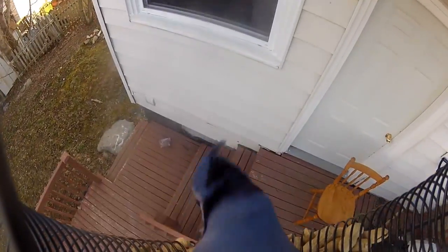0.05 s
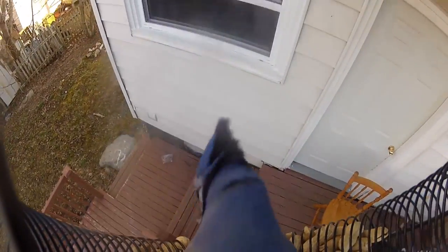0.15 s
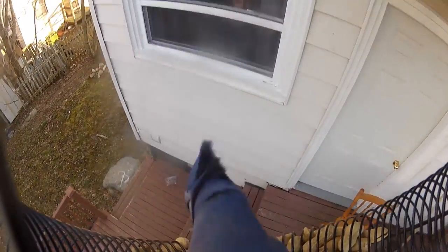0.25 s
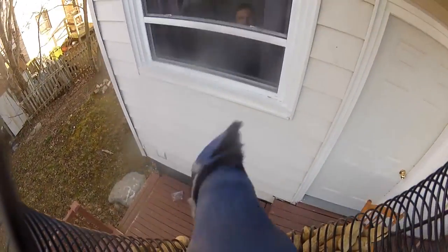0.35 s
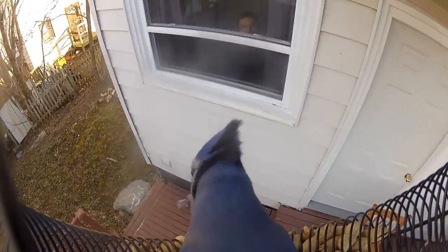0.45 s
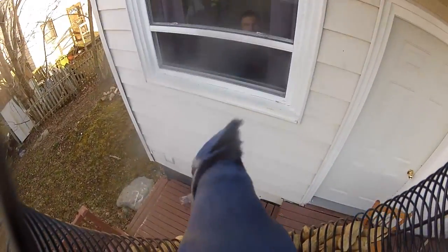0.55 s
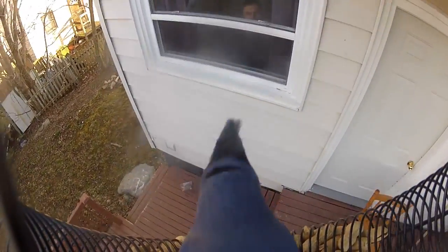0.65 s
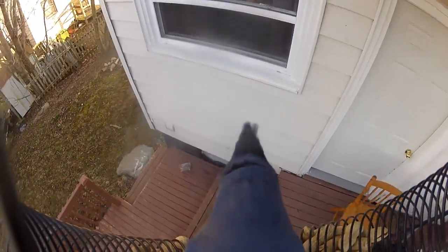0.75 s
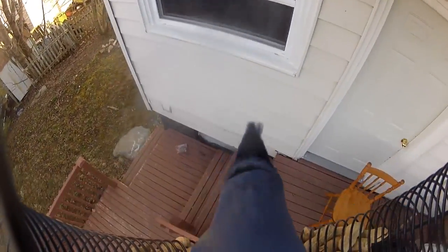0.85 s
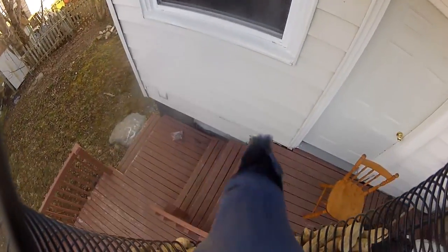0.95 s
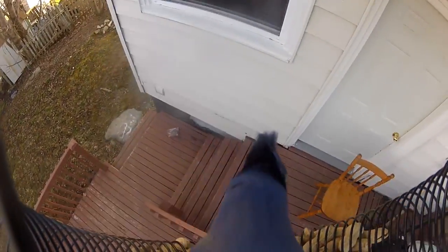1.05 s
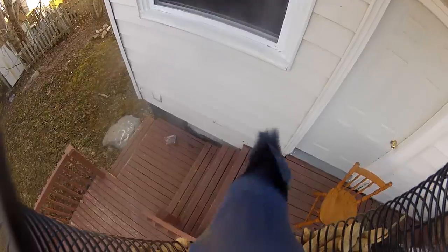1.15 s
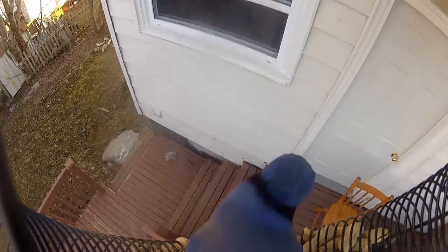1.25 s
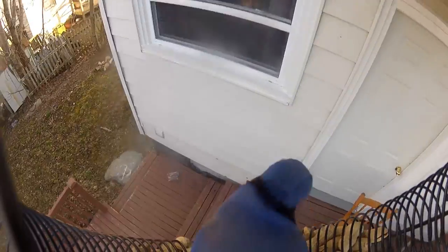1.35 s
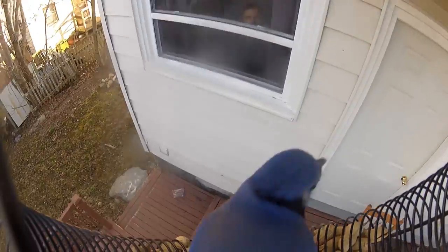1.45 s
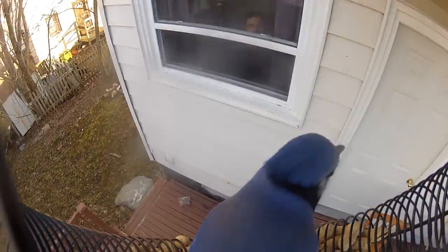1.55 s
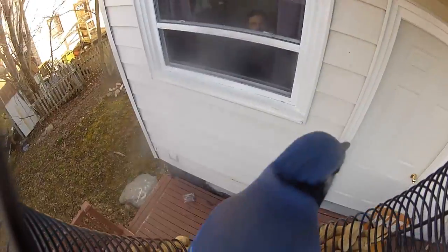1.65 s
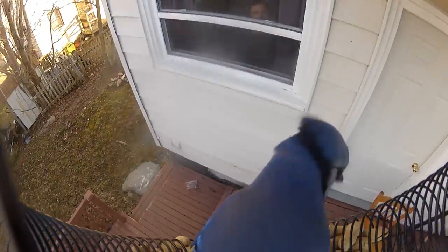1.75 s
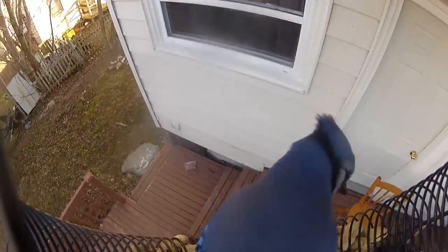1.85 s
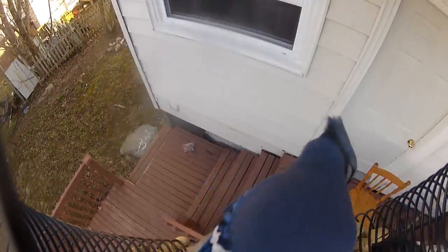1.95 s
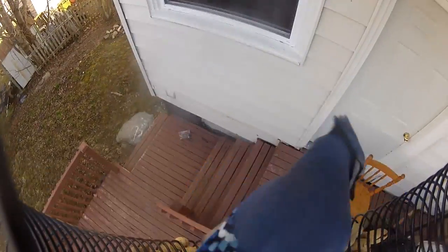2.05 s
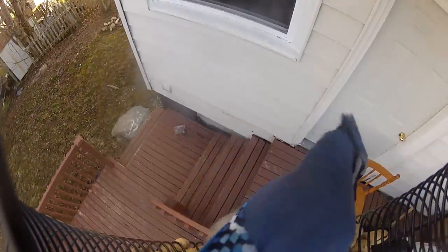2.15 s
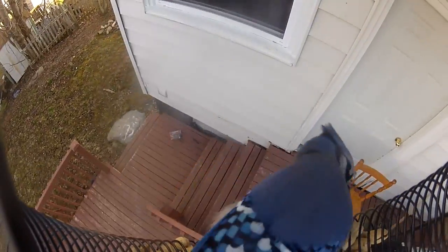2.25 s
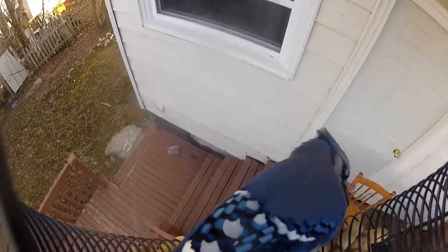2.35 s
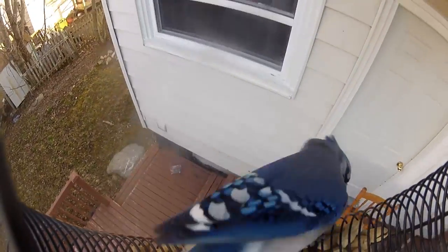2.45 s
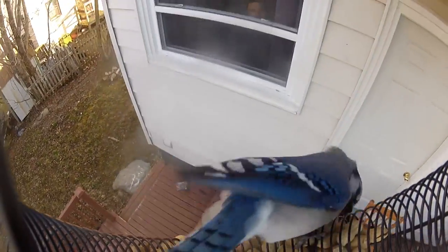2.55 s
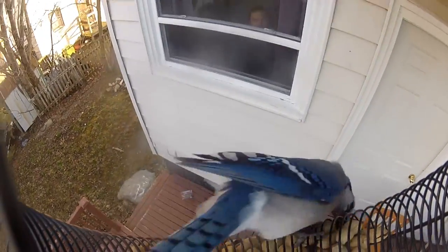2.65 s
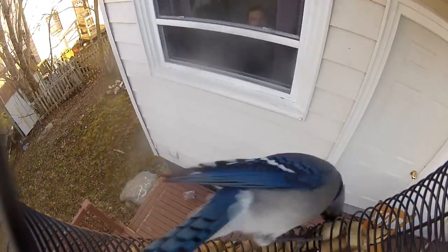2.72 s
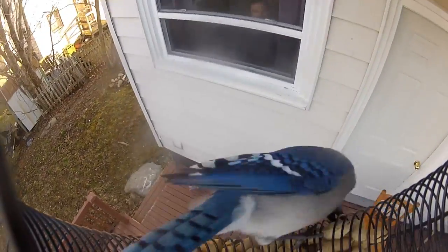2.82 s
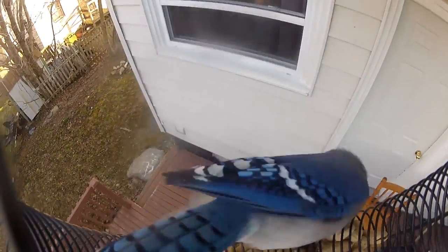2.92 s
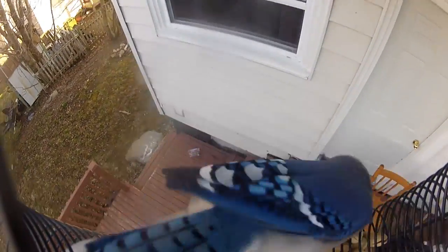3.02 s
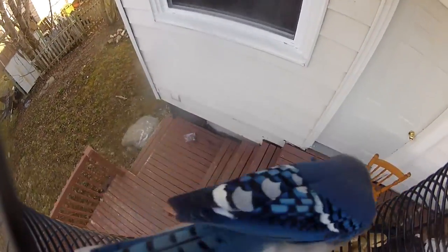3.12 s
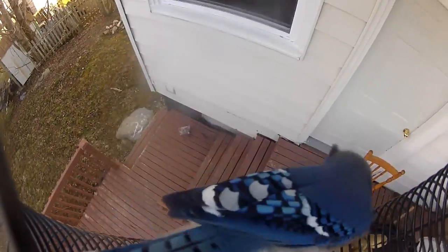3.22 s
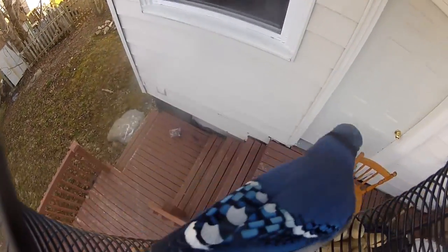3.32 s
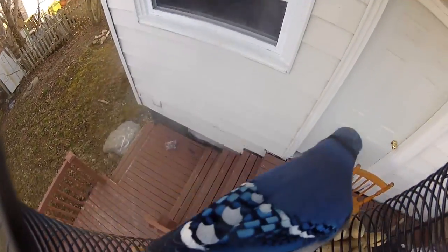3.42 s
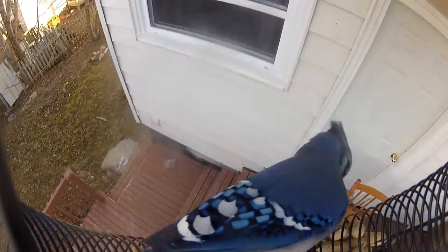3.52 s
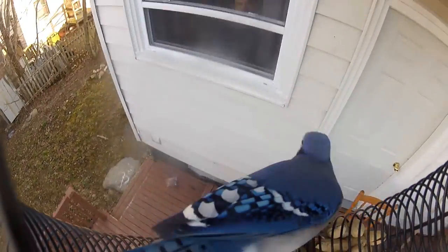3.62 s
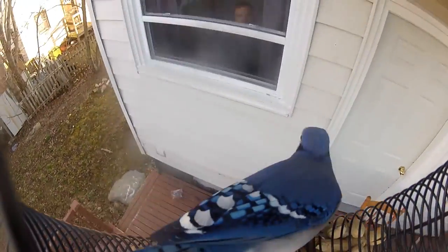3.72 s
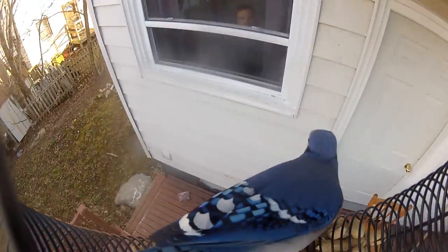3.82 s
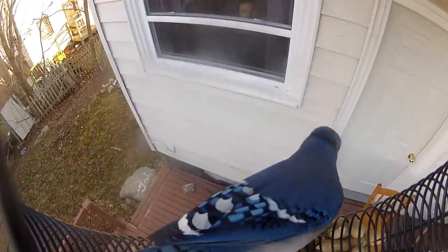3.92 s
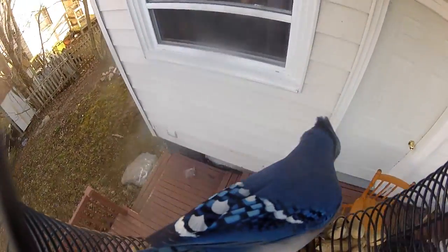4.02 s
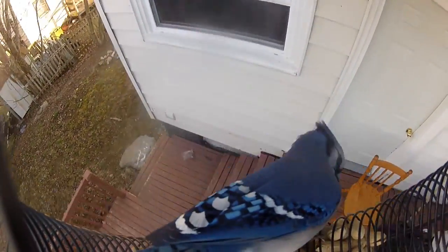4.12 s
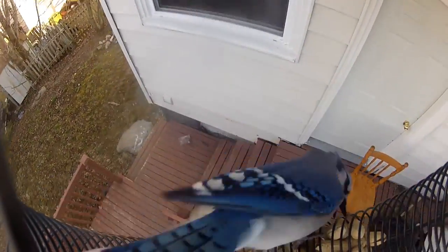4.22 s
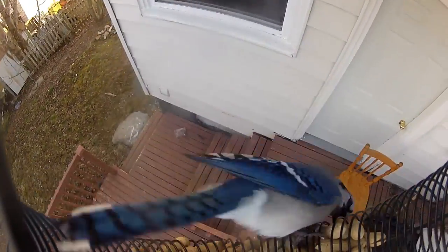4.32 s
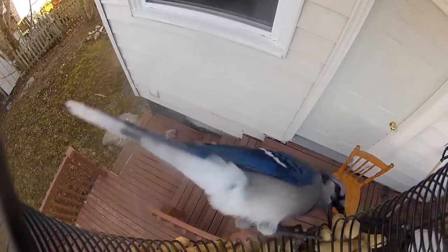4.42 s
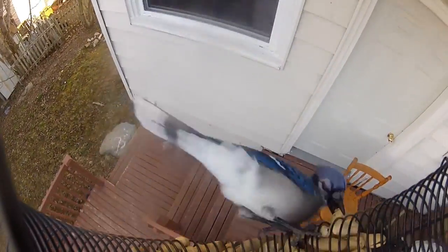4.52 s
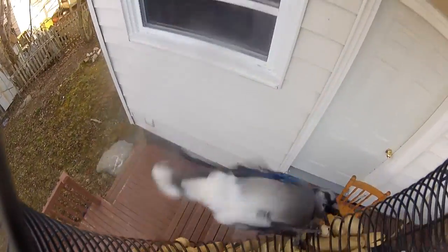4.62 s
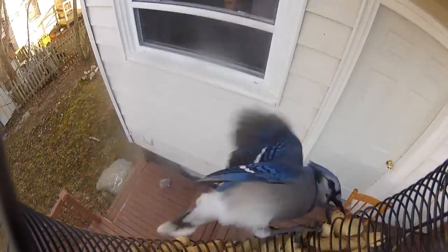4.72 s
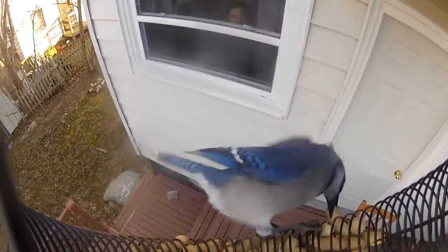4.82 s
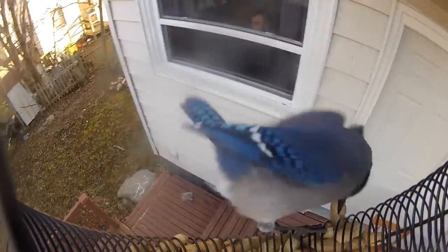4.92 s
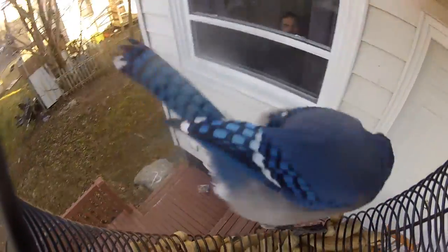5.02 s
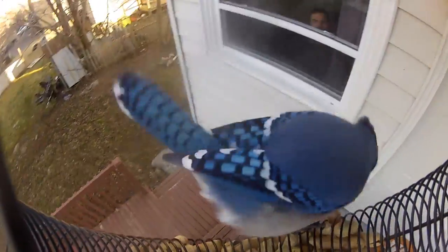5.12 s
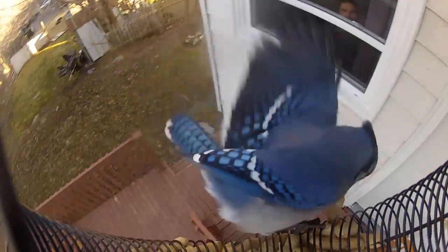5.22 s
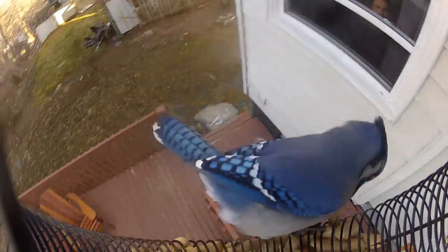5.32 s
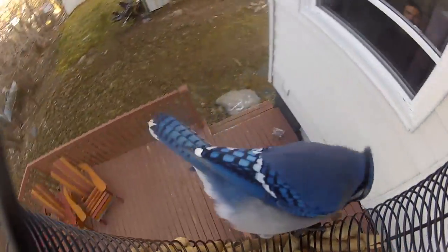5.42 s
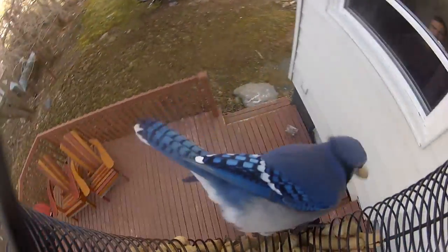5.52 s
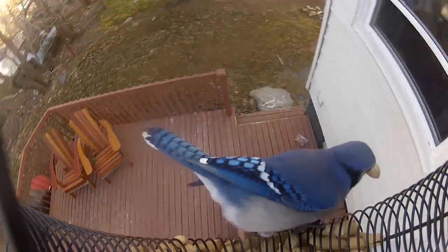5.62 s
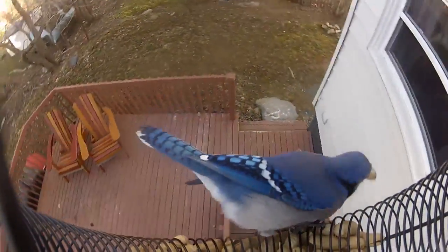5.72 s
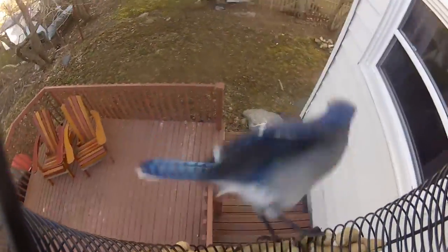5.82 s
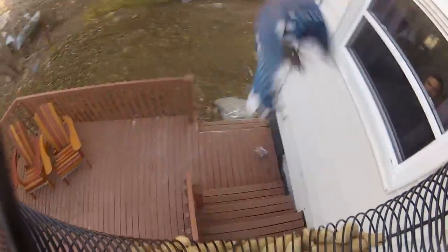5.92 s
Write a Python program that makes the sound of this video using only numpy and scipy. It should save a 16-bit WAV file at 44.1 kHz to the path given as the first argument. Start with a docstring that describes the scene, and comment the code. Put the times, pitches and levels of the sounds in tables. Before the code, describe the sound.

Heard from on the feeder itself, a jay's claws and beak clatter on springy wire, then pause with only faint ticks. From about 1.5 seconds tugs rattle the nuts, with wire pings and a falling zing. After a brief lull near four seconds, the hardest knocks crack on the housing in quick clusters, low rumbles following. It thins out and ends on one more sharp knock.

```python
"""A jay shifts about on a wire-coil peanut feeder, pecks, and tugs a nut loose; the microphone sits on the feeder.
First claws and beak chatter on the wires, as filtered noise decaying by band, then come sparse light touches.
From 1.5 s tugs set the nuts jostling (random clicks through resonances), with wire rings and falling zings.
After a lull near 4 s the hardest blows crack on the housing (decaying modes), and one more knock ends it.
Throughout, the swaying feeder rumbles after each tug and the yard behind is quiet, both as coloured noise."""
import sys
import numpy as np
from scipy import signal
from scipy.io import wavfile

SR = 44100
rng = np.random.default_rng(int(sys.argv[2]) if len(sys.argv) > 2 else 0)


def put_to_file(sound):
    """Save the sound as 16-bit audio at rate SR, in the file named by the first command-line argument."""
    columns = np.atleast_2d(sound).T  # one column per channel
    safe = np.clip(columns, -1, 1)
    whole_steps = np.round(safe * 32767)
    wavfile.write(sys.argv[1], SR, whole_steps.astype(np.int16))


N = 262836
TIME = np.arange(N) / SR
CUTOFF_HZ = 16000

# Beak and claws scuffing the coil: (time [s], level [dB], thud re level [dB],
# scratch re level [dB], pitch of the struck wire [Hz])
TOUCHES = [(0.046, -39.5, -26, -11.5, 890), (0.073, -27, -31, -39, 765), (0.153, -33, -26, -28, 610),
           (0.232, -24.5, -16, -22.5, 2960), (0.25, -19.5, -33, -26, 1363), (0.276, -11, -21.5, -31, 820),
           (0.307, -14, -20, -29.5, 916), (0.841, -37, -18, -30, 1023), (0.994, -48, -5.5, -30, 860),
           (1.275, -53, -7, -30, 845), (1.322, -42, -52, -24, 2690), (1.504, -15.5, -20, -21.5, 974),
           (1.551, -14, -14.5, -24.5, 2895), (1.618, -10.5, -28.5, -34, 1005),
           (1.874, -33.5, -42, -21, 900), (1.896, -9.5, -24.5, -35.5, 877), (1.951, -41, -18, -10, 900),
           (1.977, -18, -19, -35, 717), (2.002, -11, -22.5, -35, 2197), (2.105, -12.5, -23.5, -18.5, 890),
           (2.197, -20.5, -27, -27, 2346), (2.218, -20, -39, -49, 2450), (2.609, -15.5, -19.5, -22, 970),
           (2.719, -23.5, -9.5, -26, 690), (2.835, -15, -14, -32, 1630), (2.857, -18.5, -6, -31, 920),
           (2.992, -13.5, -17, -45, 660), (3.112, -9, -28, -30, 1593), (3.192, -13.5, -17, -49, 630),
           (3.351, -6.5, -17.5, -40, 1044), (3.372, -12.5, -24.5, -38, 648), (3.754, -37, -33, -35, 1750),
           (4.309, -38, -25, -19, 2345), (4.405, -29, -8.5, -29, 1060), (4.436, -23, -7.5, -36, 1630),
           (4.5, -15, -11.5, -38, 1650), (4.57, -16.5, -8.5, -40, 940), (4.704, -8, -44, -31.5, 2230),
           (5.5, -16.5, -16, -36, 985), (5.665, -32.5, -30, -40, 620), (5.747, -28.5, -5, -34, 590),
           (5.906, -28, -33, -27, 2210)]


def touches(responses, clang_db=-11.5, weight=0.078, grip_s=0.0036, chatter_s=0.0029,
            wire_db=-11, wire_t60=0.088, held_t60=1.3):
    """Impulse excitation with stick-slip: a push and a burst of tiny slips drive the coil and ring one wire."""
    forces, wires = np.zeros((len(responses), 3, N)), np.zeros(N)
    t = np.arange(-SR // 50, SR // 16) / SR
    # cubing the noise makes the slips spiky
    slips = rng.standard_normal((len(TOUCHES), len(t))) ** 3
    for k, (s, db, thud, scratch, hz) in enumerate(TOUCHES):
        push, shake, scrape = forces[k % len(responses)]
        burst = slips[k] * np.exp(-abs(t) / np.where(t < 0, grip_s, chatter_s))
        burst = burst / np.linalg.norm(burst)
        add(push, s, from_db([db + thud]))
        # the more weight behind a touch, the more the whole coil clangs
        add(shake, s + t[0], from_db(db + clang_db + weight * thud) * burst)
        add(scrape, s + t[0], from_db(db + scratch) * burst)
        add(wires, s, from_db(db + wire_db) * wire_tone(hz, wire_t60, rise_s=0.00018))
    # the foot that holds the wire damps it
    held = responses * dying(np.arange(SR) / SR, held_t60)
    return through_coil(forces, held) + wires


# Relative colour of the ringing coil: (frequency [Hz], level per hertz [dB])
COIL = [(140, -13), (240, -1), (320, -3), (680, -4.5), (800, -3.5), (1000, -4.5), (1600, -5.5), (2450, -2),
        (2800, -14), (3300, 4), (4300, -70.5), (7500, -41.5), (9800, -14), (12200, -27.5), (15000, -23.5)]
# First decay of the coil, before any damping by feet or nuts: (frequency [Hz], t60 [s])
COIL_T60 = [(150, 0.63), (400, 0.25), (900, 0.18), (2000, 0.11), (5500, 0.021), (10000, 0.13),
            (15000, 0.17)]
# Weaker after-ring of the spring, before the same damping: (frequency [Hz], t60 [s])
SPRING_T60 = [(150, 6.5), (400, 0.49), (900, 0.32), (2000, 0.26), (5500, 0.042), (10000, 0.62),
              (15000, 2.1)]
# Resonances of the frame that carries the coil: (frequency [Hz], width [Hz], added gain [dB])
FRAME = [(316.3, 3.6, 12), (525, 6.7, -4.5), (687.3, 36.4, 9), (974, 75, 11), (1287, 81, 0.5),
         (1630, 8.4, 9.5), (2358, 76, -1)]


def coil_responses(spring_db=-18, split_hz=580, spread_s=0.00045, scratch_t60=0.068, count=8):
    """Dispersion and two-stage decay: (thud, clang, scratch) at several places, rms 1 over the first 20 ms."""
    t, ring = np.arange(SR) / SR, 0
    for hz, band in noise_bands(118.5, (count, SR), count=36):
        # bending waves in wire are dispersive: the lows build up later than the highs
        arrival = 1 - np.exp(-t / (spread_s * np.sqrt(1000 / hz)))
        first_decay = dying(t, at_hz(COIL_T60, hz))
        after_ring = from_db(spring_db) * dying(t, at_hz(SPRING_T60, hz))
        ring = ring + band * (from_db(at_hz(COIL, hz)) * arrival * (first_decay + after_ring))
    ring = ring + sum(from_db(db) * resonance(ring, hz, width) for hz, width, db in FRAME)
    scratch_noise = butter(rng.standard_normal((count, SR)), [3000, 9500], "band")
    scratch = scratch_noise * dying(t, scratch_t60)
    thud = butter(ring, split_hz, "low", order=4)
    clang = butter(ring, split_hz, "high", order=4)
    parts = np.stack([thud, clang, scratch], axis=1)
    return parts / np.sqrt(np.mean(parts[..., :SR // 50] ** 2, axis=-1, keepdims=True))


def through_coil(forces, responses):
    """Linear superposition: each force is convolved with the response at its place, then all are summed."""
    return signal.fftconvolve(forces, responses, axes=-1)[..., :N].reshape(-1, N).sum(axis=0)


# Sharp pecks and knocks: (time [s], strength [dB], strongest pitch [Hz])
CRACKS = [(0.409, -21, 1190), (1.079, -52.5, 2430), (1.898, -13, 1350), (2.173, -22, 1330),
          (2.288, -21, 2100), (2.309, -30, 2080), (2.389, -27.5, 2020), (2.898, -13, 2300),
          (2.926, -13, 1000), (2.997, -22, 1960), (3.076, -14.5, 2160), (3.227, 0.5, 1470),
          (3.397, -8.5, 2030), (3.506, -13, 2170), (3.626, -40.5, 2215), (4.608, -9, 2200),
          (4.6405, -3.5, 1600), (4.672, -13.5, 1900), (4.89, -11.5, 1350), (4.911, 6, 1360),
          (5.021, -2.5, 930), (5.083, -14.5, 1240), (5.163, -8.5, 980), (5.178, 1, 2290), (5.185, 2, 2600),
          (5.216, -10, 1340), (5.235, -0.5, 2630), (5.33, -24, 2100), (5.352, -15, 1280), (5.378, -32, 947),
          (5.443, -26.5, 2040), (5.717, -33.5, 1930), (5.942, 3.5, 2500)]
# Relative modes of the housing: (frequency [Hz], level [dB])
HOUSING = [(680, -6), (950, -12.5), (1180, -4.5), (1350, 0), (1650, -3), (2035, -3), (2250, 0), (2390, 0),
           (2890, -9.5), (3730, -16), (8260, -22), (9100, -11.5), (9960, -9.5), (10700, -17.5),
           (13600, -12), (14900, -10.5)]
# a harder knock chokes the ring: its t60 is half of this limit at CHOKE_DB
KNOCK_T60_S, CHOKE_DB = 0.068, -8.5


def cracks(responses, level_db=-7, focus_db=6, scatter_db=2, rise_s=0.0004,
           snap_db=-14, snap_t60=0.019, thud_db=-29, clang_db=-25, stir_s=0.033,
           dull_hz=1300, dull_db_per_octave=25, hard_db=-14, snap_growth=0.33):
    """Modal excitation: a knock snaps, rings housing modes most near its own pitch, and stirs the coil."""
    out, t = np.zeros(N), np.arange(SR // 10) / SR
    chance = rng.standard_normal((len(CRACKS), len(HOUSING), 2))
    snap_noise = butter(rng.standard_normal((len(CRACKS), len(t))), 1600, "low", order=1)
    snaps = snap_noise * dying(t, snap_t60)
    for i, (s, db, pitch) in enumerate(CRACKS):
        thud, clang, _ = responses[i % len(responses)]
        t60 = KNOCK_T60_S / (1 + from_db(db - CHOKE_DB))
        # hard knocks snap most; low ones are soft contacts with little snap
        hardness_db = snap_growth * max(db - hard_db, 0)
        softness_db = dull_db_per_octave * min(np.log2(pitch / dull_hz), 0)
        add(out, s, from_db(db + snap_db + hardness_db + softness_db) * snaps[i])
        # the shorter the ring, the less the knock stirs the coil
        stirred = from_db(thud_db) * thud + from_db(clang_db) * clang
        add(out, s, from_db(db) * t60 / stir_s * stirred)
        for k, ((hz, mode_db), (strength, detune)) in enumerate(zip(HOUSING, chance[i])):
            octaves_away = min(abs(np.log2(hz / pitch)), 1)
            gain = from_db(db + level_db + mode_db - focus_db * octaves_away + scatter_db * strength)
            # successive modes alternate in polarity
            add(out, s, (-1) ** k * gain * wire_tone(hz * (1 + 0.016 * detune), t60, rise_s))
    return out


# Single wires slipping off a claw: (time [s], frequency [Hz], level [dB], t60 [s])
TWANGS = [(1.506, 2860, -23.5, 0.034), (1.553, 2950, -22, 0.035), (1.896, 2900, -13.5, 0.016),
          (2.201, 2380, -15.5, 0.066), (3.506, 2320, -30, 0.12)]
SQUEAK_S, SQUEAK_HZ = 2.19, 14300


def twangs(overtone_hz=9100, overtone_db=-17, overtone_t60=0.056,
           squeak_db=-30, squeak_t60=0.1, after_db=-48, after_t60=0.64):
    """Free vibration: released wires ring with a high overtone; one squeaks under a dragged claw and sings on."""
    out = np.zeros(N)
    for s, hz, db, t60 in TWANGS:
        add(out, s, from_db(db) * wire_tone(hz, t60, rise_s=0.00022))
        add(out, s, from_db(db + overtone_db) * wire_tone(overtone_hz, overtone_t60, rise_s=0.00027))
    add(out, SQUEAK_S, from_db(squeak_db) * wire_tone(SQUEAK_HZ, squeak_t60, rise_s=0.0053))
    add(out, SQUEAK_S, from_db(after_db) * wire_tone(SQUEAK_HZ, after_t60, rise_s=0.008))
    return out


def wire_tone(hz, t60, rise_s):
    """Damped oscillation: one mode swells briefly and rings out exponentially."""
    t = np.arange(int(t60 * SR) + 1) / SR
    return np.sin(2 * np.pi * hz * t) * (1 - np.exp(-t / rise_s)) * dying(t, t60)


# Kicks that run along the coil and come back: (time [s], level [dB])
ZINGS = [(0.285, -27), (1.555, -34), (2.858, -26), (3.358, -12.5)]
ZING_FROM_HZ, ZING_TO_HZ, ZING_FALL_S = 1150, 52.4, 0.021


def zings(rise_s=0.0088, t60=0.18):
    """Dispersion: bending waves reach the coil's end treble first, so a kick sweeps down into a low bump."""
    out, t = np.zeros(N), np.arange(SR // 4) / SR
    hz = ZING_TO_HZ + (ZING_FROM_HZ - ZING_TO_HZ) * np.exp(-(t / ZING_FALL_S) ** 2)
    tone = np.sin(2 * np.pi * np.cumsum(hz) / SR)
    sweep = tone * (1 - np.exp(-t / rise_s)) * dying(t, t60)
    for s, db in ZINGS:
        add(out, s, from_db(db) * sweep)
    return out


# The bird shifts its weight or tugs at a nut:
# (time [s], hold [s], relative effort [dB], relative swing of the feeder [dB])
TUGS = [(0.0, 0.044, -42.5, -37.5), (0.259, 0.051, -33, -44), (0.42, 0.023, -44.5, -36.5),
        (1.56, 0.067, -44, -42.5), (1.758, 0.089, -52.5, -44), (2.02, 0.25, -38.5, -34),
        (2.48, 0.072, -55.5, -45), (2.738, 0.17, -35.5, -34.5), (2.861, 0.2, -22, -31),
        (3.06, 0.13, -34.5, -32.5), (3.362, 0.018, -24, -29), (3.56, 0.25, -57, -42.5),
        (4.23, 0.18, -57.5, -49), (4.498, 0.077, -27, -29.5), (4.608, 0.029, -18, -28.5),
        (4.741, 0.058, -23, -25.5), (4.95, 0.24, -26.5, -31), (5.163, 0.039, -20, -28),
        (5.34, 0.031, -30.5, -37), (5.51, 0.059, -38, -44), (5.76, 0.075, -50.5, -41.5),
        (5.91, 0.052, -41.5, -42)]
# every tug builds up at one rate; afterwards each part of the feeder calms at its own
TUG_RISE_DB_PER_S = 315
RATTLE_FALL_DB_PER_S, JOSTLE_FALL_DB_PER_S, SWAY_FALL_DB_PER_S = 179, 85.5, 70


def shaking(levels_db, fall_db_per_s, settle_db, settle_db_per_s, rest_db):
    """Two-stage decay in dB: each tug rises, holds, falls by about settle_db, then settles towards rest."""
    out = np.full(N, float(rest_db))
    for (s, held_s, _, _), db in zip(TUGS, levels_db):
        before, after = np.maximum(s - TIME, 0), np.maximum(TIME - s - held_s, 0)
        release = np.maximum(-fall_db_per_s * after, settle_db - settle_db_per_s * after)
        out = np.maximum(out, db - TUG_RISE_DB_PER_S * before + release)
    return out


def nuts(responses, rattle_db=-7, clack_db=-8, tick_db=-9, wedged_db=-40, wedging=0.29,
         soft_hz=3300, soft_width_hz=1100, softness=0.56):
    """Random impacts: tugged nuts rattle on the wires, clack together and tap the housing."""
    effort_db = shaking(np.array(TUGS)[:, 2], RATTLE_FALL_DB_PER_S,
                        settle_db=-28.5, settle_db_per_s=61, rest_db=-66)
    # the nuts stick and then give way in little slides
    sliding_db = effort_db + slides(per_s=28, surge_db=8, slide_s=0.014)
    rattle = jostle(responses[:, 1], sliding_db, per_s=170, spread_db=1.0, damped_t60=0.24)
    rattle = rattle * from_db(rattle_db)
    # a nut is softer than a claw and misses the bright edge of the wire
    rattle = rattle - softness * resonance(rattle, soft_hz, soft_width_hz)
    # under gentle shaking the nuts stay wedged and knock together less
    loose_db = sliding_db + wedging * np.minimum(effort_db - wedged_db, 0)
    return rattle + nut_clacks(loose_db + clack_db) + housing_ticks(loose_db + tick_db)


def slides(per_s, surge_db, slide_s):
    """Stick-slip: the level in dB jumps as a nut gives way at a random moment, then relaxes."""
    gave_way = np.maximum.accumulate(np.where(rng.random(N) < per_s / SR, TIME, -np.inf))
    surge = np.exp(-(TIME - gave_way) / slide_s)
    return surge_db * (surge - surge.mean())


def jostle(responses, level_db, per_s, spread_db, damped_t60):
    """Damped impulse response: bumps at random places ring the wires, damped by what leans on them."""
    damped = responses * dying(np.arange(SR) / SR, damped_t60)
    damped = damped / np.linalg.norm(damped, axis=1, keepdims=True)
    return through_coil(bumps(level_db, per_s, spread_db, count=len(damped)), damped)


def nut_clacks(level_db, per_s=320, spread_db=6, lowest_hz=600, highest_hz=2500, width_hz=170,
               husk_hz=2700, count=14):
    """Cavity-like resonance: nuts knock and ring at hollow pitches, and soft husks take the edge off."""
    # the factor offsets the narrow resonances' loss of energy
    clicks = bumps(level_db, per_s, spread_db, count=count) * np.sqrt(SR / (np.pi * width_hz))
    pitches = np.geomspace(lowest_hz, highest_hz, count)
    rings = sum(resonance(row + 1e-18, hz, width_hz) for row, hz in zip(clicks, pitches))
    return butter(rings, husk_hz, "low", order=4)


def housing_ticks(level_db, per_s=55, spread_db=4, width_hz=50, scatter_db=4):
    """Modal excitation: nuts tap the housing at random, each tap with its own mix of modes."""
    taps, out = bumps(level_db, per_s, spread_db, count=1)[0], 0
    for k, (hz, db) in enumerate(HOUSING):
        strikes = taps * from_db(db + scatter_db * rng.standard_normal(N))
        out = out + (-1) ** k * resonance(strikes + 1e-18, hz, width_hz)
    return out * np.sqrt(SR / (np.pi * width_hz * len(HOUSING)))


def bumps(level_db, per_s, spread_db, count, busy_db=-30, crowding=0.35):
    """Random impulse process: uneven clicks with summed rms near level_db, denser under harder shaking."""
    rate = per_s * from_db(crowding * (level_db - busy_db)) / SR
    sizes = rms_one(from_db(spread_db * np.clip(rng.standard_normal((count, N)), -2, 1.5)))
    sizes = sizes * rng.choice([-1, 1], (count, N))
    happens = rng.random((count, N)) < rate / count
    return sizes * happens * from_db(level_db) / np.sqrt(rate)


def bumping(responses, bump_db=-8, follows=0.75):
    """Compressed response to effort: the load of nuts bumps dully in the coil even at a gentle tug."""
    load_db = shaking(follows * np.array(TUGS)[:, 2], JOSTLE_FALL_DB_PER_S,
                      settle_db=-24, settle_db_per_s=26.5, rest_db=-80.5)
    return from_db(bump_db) * jostle(responses[:, 0], load_db, per_s=95, spread_db=1.5, damped_t60=1.0)


# Relative colour of the hanging feeder's low swing: (frequency [Hz], level per hertz [dB])
SWAY = [(15, -39), (28, 12), (55, 6.5), (75, 9.5), (105, 7), (160, -13.5), (260, -42)]


def sway():
    """Slow damping: low noise swells with each tug as the hanging feeder rumbles and comes to rest."""
    swing_db = shaking(np.array(TUGS)[:, 3], SWAY_FALL_DB_PER_S,
                       settle_db=-7, settle_db_per_s=23.5, rest_db=-53.5)
    return from_db(swing_db) * coloured_noise(SWAY)


def fidgets(responses, damped_t60=0.28):
    """Stationary random impacts: toes shift on the wires in faint, scattered ticks."""
    return jostle(responses[:, 1], np.full(N, -67.0), per_s=80, spread_db=3, damped_t60=damped_t60)


# Relative colour of the still air of the yard: (frequency [Hz], level per hertz [dB])
AIR = [(15, -10.5), (25, 0), (92, -51), (170, -1), (301, 2), (560, -14), (2350, -23), (6050, -34.5),
       (6920, -39), (14400, -36.5), (16000, -52)]
AIR_DB = -57


def yard_air():
    """Stationary broadband noise: the quiet yard keeps one level and colour."""
    return from_db(AIR_DB) * coloured_noise(AIR)


def coloured_noise(spectrum):
    """Spectral shaping: weighted noise bands add up to steady noise of rms 1."""
    bands = noise_bands(14.63, (N,), count=20)
    return rms_one(sum(from_db(at_hz(spectrum, hz)) * band for hz, band in bands))


def noise_bands(lowest_hz, shape, count):
    """Band decomposition: yield (centre Hz, noise), neighbouring bands drawn from independent noises."""
    white = rng.standard_normal((2, *shape))
    edges = np.geomspace(lowest_hz, CUTOFF_HZ + 1000, count + 1)
    for k in range(count):
        yield np.sqrt(edges[k] * edges[k + 1]), butter(white[k % 2], edges[k:k + 2], "band")


def from_db(db):
    """Logarithmic level: decibels to amplitude gain."""
    return 10 ** (np.asarray(db) / 20)


def rms_one(x):
    """Normalisation: scale to rms 1."""
    return x / np.sqrt(np.mean(x ** 2) + 1e-20)


def at_hz(points, hz):
    """Interpolation: read a table on a log-frequency axis."""
    return np.interp(np.log(hz), np.log(np.array(points)[:, 0]), np.array(points)[:, 1])


def dying(t, t60):
    """Exponential decay: 60 dB down at t60."""
    return np.exp(-np.log(1000) * t / t60)


def butter(x, hz, kind, order=2):
    """Maximally flat filtering: a causal Butterworth filter."""
    return signal.sosfilt(signal.butter(order, hz, kind, fs=SR, output="sos"), x)


def resonance(x, hz, width):
    """Simple resonator: two poles with gain close to 1 at the peak."""
    r = np.exp(-np.pi * width / SR)
    poles = [1, -2 * r * np.cos(2 * np.pi * hz / SR), r * r]
    return signal.lfilter(np.array([1, 0, -1]) * (1 - r * r) / 2, poles, x)


def add(track, s, sound):
    """Superposition: mix a sound into a track at time s."""
    start = round(s * SR)
    track[start:start + len(sound)] += sound[:N - start]


def scene():
    """Structure-borne sound: everything reaches the microphone through the feeder, so there is no room."""
    responses = coil_responses()
    bird = touches(responses) + cracks(responses) + twangs() + zings()
    load = nuts(responses) + bumping(responses) + sway()
    return (bird + load + fidgets(responses) + yard_air())[None]


# The microphone port swallows one band: (frequency [Hz], width [Hz], share taken away [fraction])
PORT = (6030, 890, 0.74)


def record(dry):
    """Notch filtering and clipping: the port dips the treble, peaks stop at full scale, the top is cut."""
    hz, width, share = PORT
    heard = np.clip(dry - share * resonance(dry, hz, width), -1, 1)
    return signal.sosfilt(signal.ellip(10, 0.2, 80, CUTOFF_HZ, fs=SR, output="sos"), heard)


dry = scene()
out = record(dry)
put_to_file(out)
```